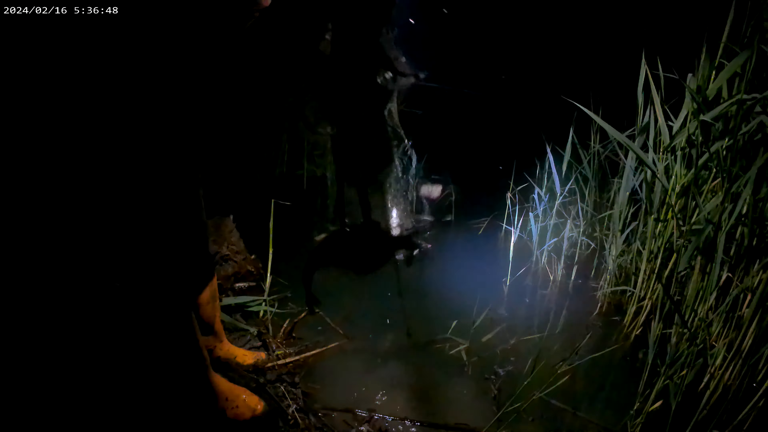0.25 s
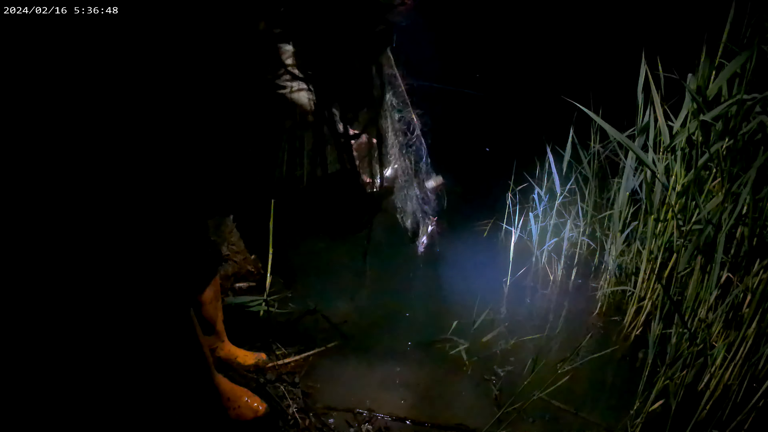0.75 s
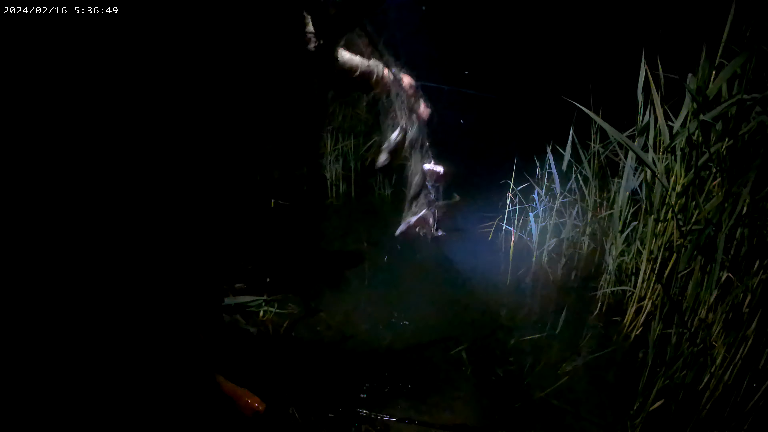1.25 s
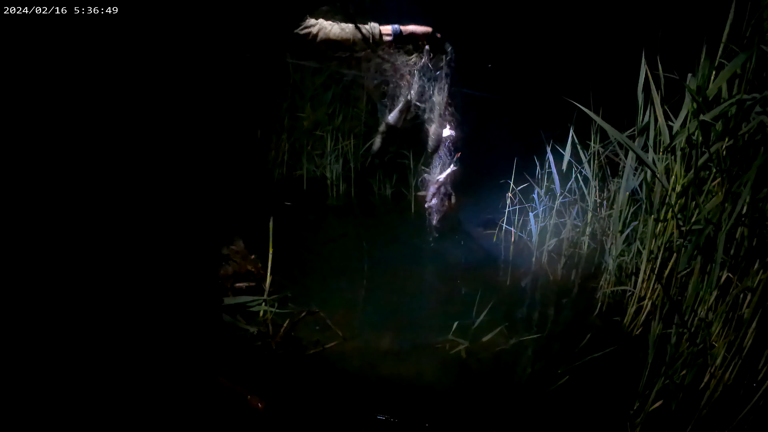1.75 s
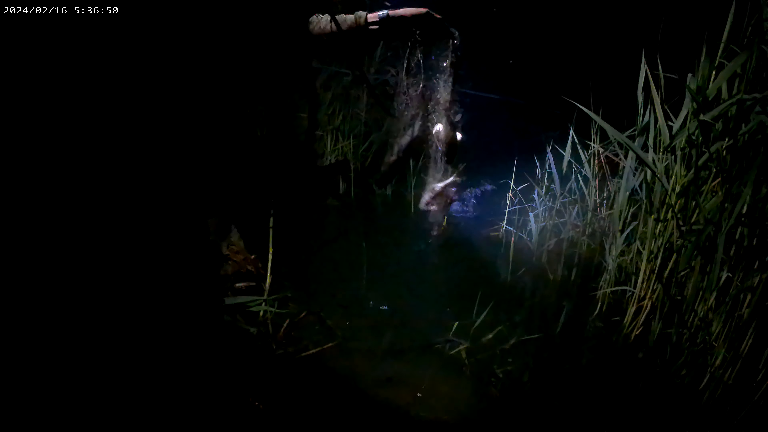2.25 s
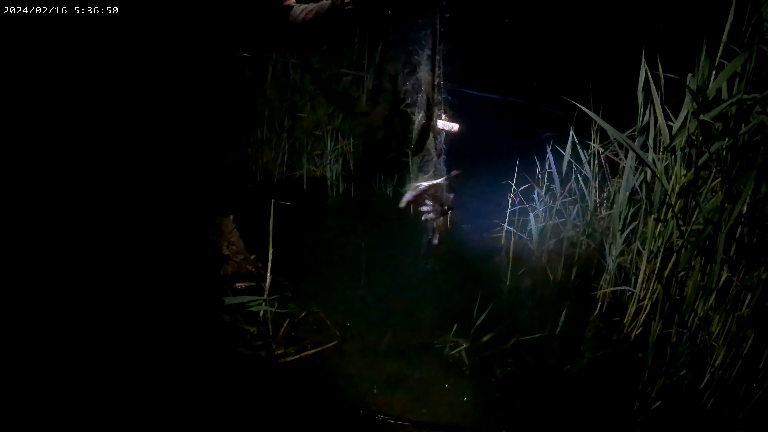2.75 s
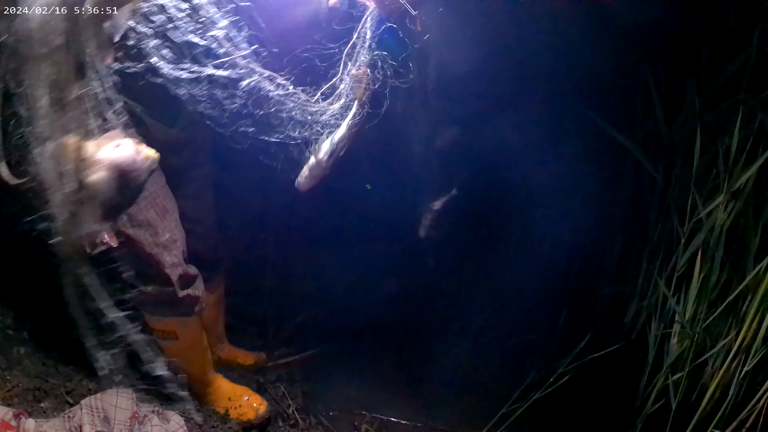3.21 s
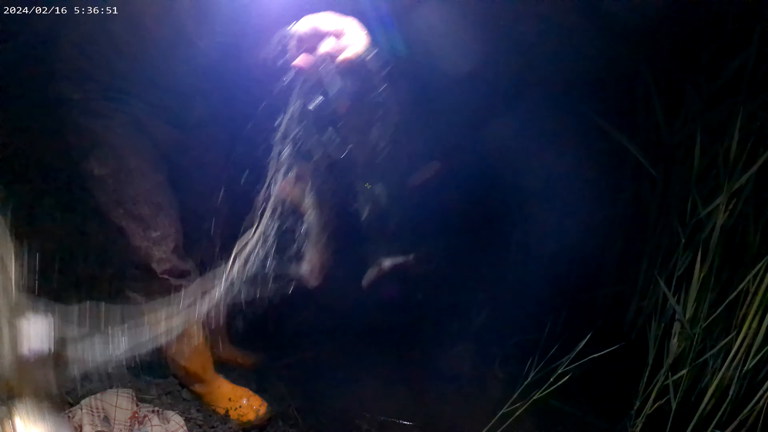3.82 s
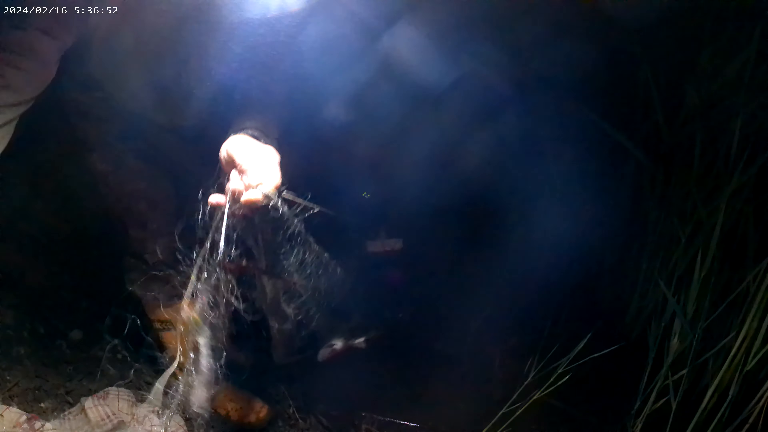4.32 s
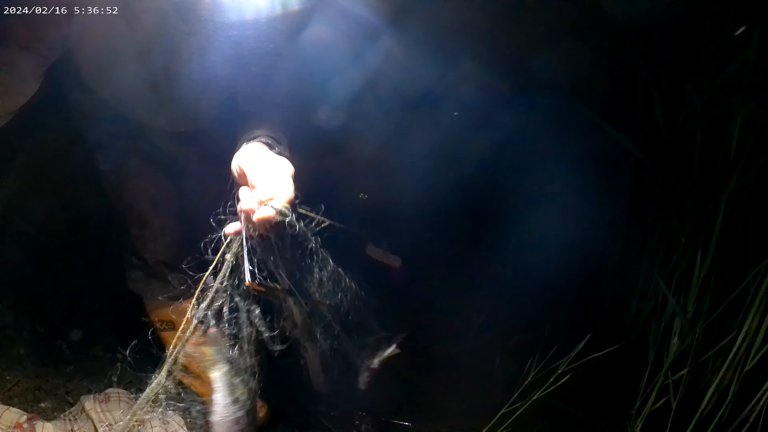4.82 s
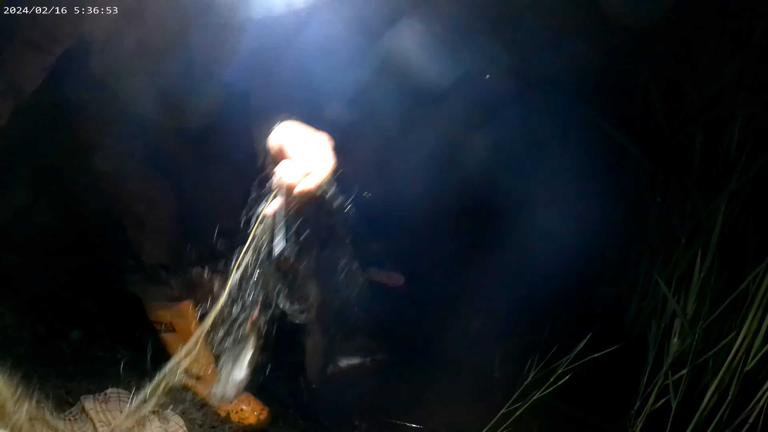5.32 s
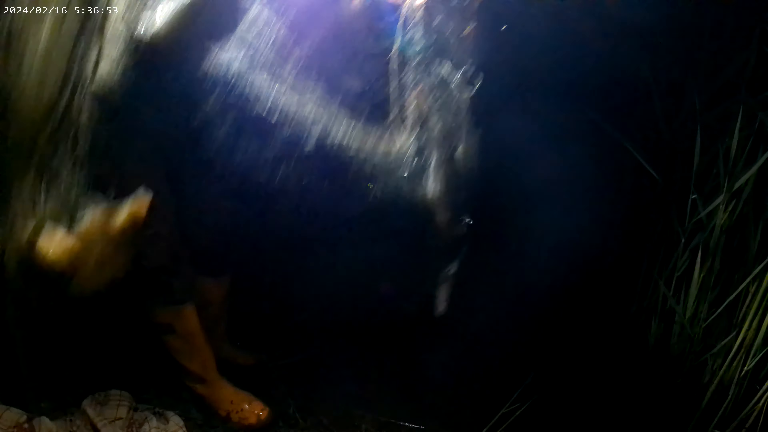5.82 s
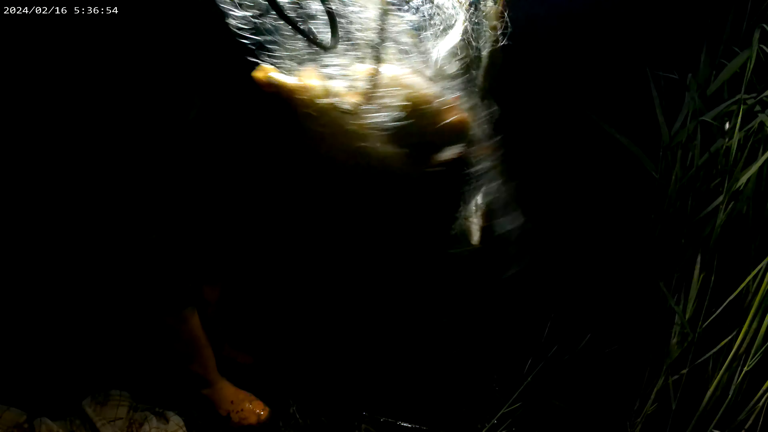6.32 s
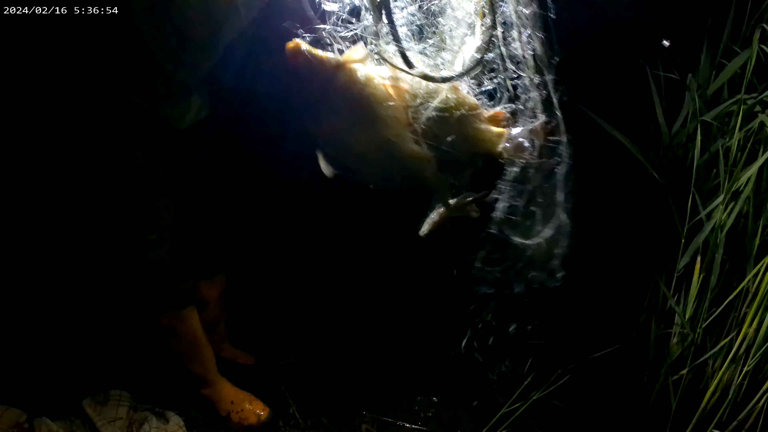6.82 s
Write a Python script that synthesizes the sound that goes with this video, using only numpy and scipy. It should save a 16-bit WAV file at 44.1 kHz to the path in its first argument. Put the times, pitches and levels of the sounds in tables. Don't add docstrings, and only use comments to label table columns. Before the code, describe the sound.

A distant one-cylinder engine thumps steadily, over five times a second, under soft night rumble and hiss. Close to a small boxy microphone outdoors, a wet fishing net drips, then sheds water in a quick run of round plops. After a lull it is dragged and handled: wet rasping, dull weight knocks, slaps and crisp strand ticks, thinning to a few late knocks, a flick and one small bubble.

```python
import sys
import numpy as np
from scipy import signal
from scipy.fft import rfft, irfft
from scipy.io import wavfile
from scipy.ndimage import uniform_filter1d

SR = 44100
rng = np.random.default_rng(int(sys.argv[2]) if len(sys.argv) > 2 else 0)


def boost(x):
    u = np.asarray(x, float) / 20
    return 10 ** u


def persist_wave(psi):
    counts = np.round(np.clip(psi, -1, 1) * 32767).astype(np.int16)
    wavfile.write(sys.argv[1], SR, np.atleast_2d(counts).T)


N = 311234
TIME = np.arange(N) / SR

# start in seconds, peak in dB, pitch in Hz, ring in seconds.
DEEP_BUBBLES = [(.51, -37, 944, .0061), (.511, -57, 1900, .006), (.512, -51.5, 717, .026),
                (.517, -56, 920, .025), (.668, -64, 1270, .007), (.756, -60.5, 3740, .012),
                (1.619, -60, 1070, .008), (1.655, -55, 1320, .008), (1.882, -49, 1600, 0.0072),
                (1.977, -51, 1110, 0.0046), (1.99, -46.5, 1090, 0.0047), (2.083, -43, 725, 0.0036),
                (2.106, -33, 1350, 0.0023), (2.176, -33.5, 1008, 0.0089), (2.186, -50, 2950, .0037),
                (2.204, -34, 860, 0.0061), (2.22, -31.5, 898, 0.019), (2.264, -49, 760, .006),
                (2.286, -49.5, 730, .014), (2.296, -59, 2200, .006), (2.327, -53, 1340, .015),
                (2.363, -43.5, 856, 0.022), (2.458, -56.5, 1370, 0.013), (2.897, -48, 1170, .006),
                (4.05, -52, 1150, .018)]
# start in seconds, peak in dB, first pitch in Hz, ring in seconds,
# glide in octaves.
SHALLOW_BUBBLES = [(.583, -57.5, 1315, .014, -.08), (.604, -51.5, 613, .026, .17),
                   (.626, -56, 760, .042, .85), (.684, -54.5, 554, .038, 0.35),
                   (2.012, -49, 860, .012, 0.38), (2.03, -55, 1150, .007, -.2),
                   (2.0584, -45, 3660, .0059, 0.39), (2.068, -51, 1676, .0095, .45),
                   (2.283, -49, 1305, .02, -.16), (2.302, -50.5, 900, 0.025, .16),
                   (2.357, -46.5, 1110, .011, 0.25), (2.392, -52, 371, .057, 0.76),
                   (6.686, -50, 1560, 0.014, -0.22)]
# peak time in seconds, gurgle in dB, rasp gain in dB (dryness),
# fade in seconds.
RUNOFF = [
    (.62, -72, 2, .08),
    (.77, -77, 13, .03),
    (1.63, -69, 4.5, 0.092),
    (2.03, -56, 3, 0.037),
    (2.1, -50.5, 2.5, 0.021),
    (2.2, -60, 4, 0.06),
    (2.32, -56.5, 3, 0.065),
    (2.4, -68, 5, 0.043),
    (2.56, -70, -10, .08),
]
# peak time in seconds, gurgle in dB, rasp gain in dB (dryness),
# fade in seconds.
DRAGS = [(3.7, -83, 9, .12), (3.9, -60, -2, 0.034), (3.95, -64, -2, .03), (4.02, -57, 2.5, 0.027),
         (4.08, -60, -2, .03), (4.14, -58.5, 3, .05), (4.22, -62.5, -1, 0.035), (4.3, -56.5, -5, .05),
         (4.375, -67, 4.5, 0.033), (4.47, -59, 7.5, 0.028), (4.56, -62.5, 2, 0.073), (4.64, -69, 4, .05),
         (4.71, -70.5, 11.5, 0.046), (4.86, -67, -9, .06), (5.15, -80, 15, .08), (5.45, -68, 5.5, 0.091),
         (5.6, -72, 5, .06), (5.75, -70, 4, .08)]
# start in seconds, body peak in dB, body pitch in Hz, crackle in dB over the body,
# length in seconds.
WEIGHTS = [(3.871, -44, 490, -8, 0.0053), (3.991, -28.5, 235, -11.5, 0.0027),
           (4.084, -33.5, 537, -14, 0.0024), (4.088, -28.5, 604, -16, 0.0034),
           (4.136, -43.5, 424, -8, 0.0074), (4.1806, -23, 392, -16, 0.0036),
           (4.1866, -28, 247, -27, 0.0016), (4.257, -36, 510, -16, 0.0012),
           (4.369, -40.5, 353, -10, 0.0029), (4.4409, -29.5, 450, -12, 0.0042),
           (4.447, -38, 402, -18, 0.0072), (5.437, -47.5, 400, -26, .0044), (5.517, -40, 630, -12, .002)]
# start in seconds, slap peak in dB, crackle in dB over the slap, length in seconds.
SLAPS = [
    (3.91, -33, -15.5, 0.0032),
    (3.9901, -28, -13, 0.0026),
    (4.01, -49, -3, 0.0067),
    (4.073, -44, -1.5, 0.0041),
    (4.192, -51, -13, 0.0031),
    (4.221, -48, -1, 0.0093),
    (4.29, -41, -6.5, .01),
    (4.309, -41, -24, .0057),
    (5.456, -54, 1, .0015),
    (5.957, -46.5, -6, .0009),
]
# start in seconds, peak in dB, brightest pitch in Hz.
TICKS = [(.3202, -51, 5490), (.412, -55, 4780), (0.4835, -56, 4050), (.73, -55, 4420), (.7694, -53, 5450),
         (.9398, -55.5, 5800), (1.039, -54, 6350), (1.333, -53.5, 3320), (1.883, -52.5, 5080),
         (1.938, -47.5, 5470), (2.014, -54, 5590), (2.102, -45, 5600), (2.27, -50, 3730),
         (2.299, -46, 5900), (2.308, -46, 3750), (2.366, -58, 4900), (2.8035, -56, 10100),
         (3.5079, -53, 4670), (3.672, -50.5, 7990), (3.919, -54, 8640), (4.008, -42, 8610),
         (4.0164, -46, 9850), (4.09, -49, 5200), (4.133, -53, 10100), (4.3211, -53, 9700),
         (4.678, -47, 10000), (4.9814, -48, 9950), (5.0744, -53, 9830), (5.1345, -53, 9740),
         (6.254, -52, 4420)]
# pitch in Hz, width in Hz, level in dB.
HOUSING = [
    (2440, 730, 3),
    (5230, 1860, -4.5),
    (9850, 990, -6),
    (15140, 980, -8),
]
# time in seconds, level in dB above the usual firing.
ENGINE_LOAD = [(.17, 0.5), (.36, -2.5), (.54, 4), (.9, -0.5), (1.1, -3), (1.82, 0.5), (2.37, 0.5),
               (3.48, 1.5), (3.84, -2), (4.21, 3), (4.95, 0), (5.5, 1.5), (5.86, 0.5), (6.04, -1.5),
               (6.4, 0.5), (6.77, 2), (7, -1)]
# start in seconds, seconds between firings.
ENGINE_PACE = [
    (0, .1832),
    (1.9, .18372),
    (5.35, .1823),
]
# centre in seconds, peak in dB, pitch in Hz.
BUMPS = [
    (0.319, -40.5, 37.3),
    (3.19, -39.5, 70),
]
# pitch in Hz, level in dB per Hz.
NIGHT_COLOUR = [(12, -29), (20, -2), (22, -5.5), (70, -2), (125, -7.5), (198, -12.5), (415, -18.5),
                (592, -21), (1170, -24.5), (1540, -29), (7310, -37.5), (12600, -38), (13700, -38)]
# time in seconds, centre in Hz, level in dB.
WHINE = [(0, 14400, -70), (1, 14400, -71), (2.9, 14400, -74), (3.079, 14050, -72), (3.35, 14300, -81),
         (3.9, 14200, -77), (5.05, 14400, -76), (5.5, 14400, -74), (6.0, 14130, -84), (6.2, 14150, -70),
         (6.4, 14450, -70), (6.85, 14280, -68), (7.06, 14400, -70)]
# start in seconds, sweep in Hz,
# share of the second pulse from 0 to 1.
WHINE_STATES = [
    (0, 143, .83),
    (3.2, 58, .9),
    (6.1, 335, .35),
]

THUMP_DB, THUMP_HZ, THUMP_SWEEP_HZ_PER_S = -42, 85.3, 8100
THUMP_RISE_S, THUMP_FALL_S = 0.0073, 0.0078
SPARK_S, SPARK_WIDTH_S = .1512057, .000031


def bubbles():
    out = np.zeros(N)
    deep = [(*row, .04) for row in DEEP_BUBBLES]
    for s, db, start_hz, ring_s, glide in deep + SHALLOW_BUBBLES:
        t = np.arange(int(2 * ring_s * SR)) / SR
        hz = start_hz * 2 ** (glide * (t / ring_s) ** 1.49)
        turns = np.cumsum(np.minimum(hz, 9000)) / SR
        shape = (1 - np.exp(-t / 0.00036)) * np.exp(-1.1 * (t / ring_s) ** 2.3)
        add(out, s, boost(db) * shape * np.sin(2 * np.pi * turns))
    return out


def scrape():
    rasp = grains(200, 1.2, 0.011) * grains(440, 3.3, 0.0027) * rng.standard_normal(N)
    gurgle = grains(220, 3.5, .005) * rng.standard_normal(N) + .4 * unit(rasp)
    gurgle = unit(gurgle) + 0.3 * fizz(260, 502, 1.754, 4.6)
    rasp = unit(rasp) + .2 * fizz(500, 2300, 1.6, 4.)

    low = unit(steep(gurgle, 946, 1130) + 0.78 * steep(gurgle, 466, 480))
    middle = unit(steep(rasp, 5400, 3200) + 0.6 * steep(rasp, 2650, 900))
    top = unit(steep(rasp, 8870, 3900) + 0.92 * steep(rasp, 15200, 1800))
    scuff = low + boost(-4) * unit(steep(gurgle, 350, 380))
    scuff = signal.sosfilt(signal.butter(N=6, Wn=1450, fs=SR, output="sos"), scuff)
    sheen = top + boost(-15) * unit(steep(rasp, 15100, 1500))

    runoff_rasp = boost(-10.5) * middle + boost(-16) * top
    drag_rasp = boost(-10) * middle + boost(-9) * sheen
    out = np.zeros(N)
    for table, wet, dry_rasp in ((RUNOFF, low, runoff_rasp), (DRAGS, scuff, drag_rasp)):
        for s, db, dry_db, fade_s in table:
            out += boost(db) * stroke(s, fade_s) * (wet + boost(dry_db) * dry_rasp)
    return out


def stroke(s, fade_s):
    return np.exp(-np.abs(TIME - s) / fade_s)


def grains(rate, spread_db, tail_s):
    size = (rng.random(N) < rate / SR) * boost(spread_db * rng.exponential(size=N))
    gate = signal.lfilter([1], [1, -np.exp(-1 / (tail_s * SR))], size)
    return uniform_filter1d(gate, size=60) + 0.64


def fizz(rate, low_hz, octaves, cycles):
    out = np.zeros(N)
    for when, pitch, size in rng.random((int(rate * N / SR), 3)):
        hz = low_hz * 2 ** (octaves * pitch)
        turns = np.arange(int(3 * cycles / hz * SR)) * hz / SR
        ring = np.exp(-turns / cycles) * np.sin(2 * np.pi * turns * (1 + 0.0138 * turns))
        add(out, when * (N - 1) / SR, boost(-16 * size) * ring)
    return unit(out)


def weights():
    out = np.zeros(N)
    for s, db, hz, crackle_db, length_s in WEIGHTS:
        add(out, s, boost(db) * blow(-8, 0, hz, crackle_db, length_s))
    return out


def slaps():
    out = np.zeros(N)
    for s, db, crackle_db, length_s in SLAPS:
        add(out, s, boost(db) * blow(0, -11, 500, crackle_db, length_s))
    return out


def blow(slap_db, body_db, hz, crackle_db, length_s):
    noise, t = rng.standard_normal((3, 2000)), np.arange(2000) / SR
    dull = signal.butter(N=6, Wn=1400, fs=SR, output="sos")
    bright = signal.butter(N=4, Wn=2100, btype="high", fs=SR, output="sos")
    slap = peak(signal.sosfilt(dull, band(burst(noise[0], length_s), 1000, 520)))
    swing = -np.sin(2 * np.pi * hz * t) + 0.34 * unit(steep(noise[1], hz, hz))
    body = peak(burst(swing, 0.72 * length_s))
    crackle = peak(signal.sosfilt(bright, housing(burst(noise[2], 1.29 * length_s))))
    return boost(slap_db) * slap + boost(body_db) * body + boost(crackle_db) * crackle


def ticks():
    out = np.zeros(N)
    for s, db, hz in TICKS:
        snap = burst(rng.standard_normal(1500), 0.0024)
        tick = housing(snap, hz, 1.0) + 2.6 * steep(snap, hz, 0.43 * hz)
        add(out, s, boost(db) * peak(tick))
    return out


def burst(noise, length_s):
    t = np.arange(len(noise)) / SR
    return noise * (1 - np.exp(-(t / (0.38 * length_s)) ** 2)) * np.exp(-(t / length_s) ** 1.05)


def housing(x, centre_hz=6000, octaves=9.):
    out = np.zeros(len(x))
    for hz, width_hz, db in HOUSING:
        off_centre = np.log2(hz / centre_hz) / octaves
        out += boost(db - 2 * off_centre ** 2) * steep(x, hz, 0.92 * width_hz)
    return out


def engine():
    out, lead = np.zeros(N), 1300
    t = np.arange(-lead, 1700) / SR
    shape = np.exp(-np.where(t < 0, (t / THUMP_RISE_S) ** 2 / 2, t / THUMP_FALL_S))
    turns = np.cumsum(np.clip(THUMP_HZ + THUMP_SWEEP_HZ_PER_S * t, 35, 165)) / SR
    thump = shape * np.cos(2 * np.pi * (turns - turns[lead]))
    for s, db in firings():
        add(out, s - lead / SR, boost(THUMP_DB + db) * thump)
    return out


def firings():
    times = [.1748]
    while times[-1] < N / SR - .2:
        times.append(times[-1] + held(ENGINE_PACE, times[-1])[0])
    jitter_s = .0008 * rng.standard_normal(len(times))
    scatter_db = .8 * rng.standard_normal(len(times))
    return zip(times + jitter_s, np.interp(times, *np.transpose(ENGINE_LOAD)) + scatter_db)


def bumps():
    out = np.zeros(N)
    for s, db, hz in BUMPS:
        t = TIME - s
        out += boost(db) * np.exp(-(t * hz / 0.56) ** 2) * np.cos(2 * np.pi * hz * t)
    return out


def night():
    hz = np.maximum(np.fft.rfftfreq(N, 1 / SR), 1)
    f, db = np.transpose(NIGHT_COLOUR[:-1])
    colour = rfft(rng.standard_normal(N)) * boost(np.interp(np.log(hz), np.log(f), db))
    low_share = 1 / (1 + (hz / 300) ** 2)
    rumble = irfft(colour * np.sqrt(low_share), N) * boost(.8 * walk(3))
    hiss = irfft(colour * np.sqrt(1 - low_share) * 1j, N) * boost(0.18 * walk(17))
    return boost(-55) * unit(rumble + hiss)


def whine():
    s, *columns = np.transpose(WHINE)
    hz, db = (np.interp(TIME, s, c) for c in columns)
    sweep_hz, second = held(WHINE_STATES, TIME)
    frame = (30 * TIME + 0.93 + 0.046 * walk(3.3)) % 1
    pulses = np.exp(-((frame - .3) / 0.13) ** 2) + second * np.exp(-((frame - .78) / 0.21) ** 2)
    waver_hz = np.minimum(40 + .6 * sweep_hz, 120) * walk(500)
    turns = np.cumsum(hz + 2 * sweep_hz * (frame - .4) + waver_hz) / SR
    tone = np.sin(2 * np.pi * turns) + boost(-12.5) * np.sin(2 * np.pi * turns * 2 / 3)
    return boost(db + 1.5 + 1.4 * walk(40)) * (pulses + 0.37) * tone


def spark():
    u = (TIME - SPARK_S) / SPARK_WIDTH_S
    kick = -(.39 + 1.32 * u) * np.exp(-u ** 2)
    limited = irfft(rfft(kick) * (np.fft.rfftfreq(N, 1 / SR) < 16800), N)
    return limited * np.exp(-((TIME - SPARK_S) / .002) ** 2)


def top_cut(x):
    hz, spectrum = np.fft.rfftfreq(N, 1 / SR), rfft(x)
    edges = np.linspace(14950, 15800, num=4)
    out, common = irfft(spectrum * (hz <= edges[0]), N), walk(30)
    for lo, hi, keep in zip(edges, edges[1:], (.9, .75, .6)):
        strip = irfft(spectrum * ((hz > lo) & (hz <= hi)), N)
        out += strip * np.clip(keep + 0.24 * common + 0.55 * walk(70), .03, 1.5)
    return out


def unit(x):
    return x / np.sqrt(np.mean(x ** 2))


def peak(x):
    return x / np.abs(x).max()


def band(x, hz, width_hz):
    return signal.lfilter(*signal.iirpeak(hz, max(hz / width_hz, .3), fs=SR), x)


def steep(x, hz, width_hz):
    return band(band(x, hz, width_hz), hz, width_hz)


def walk(rate):
    k = int(SR / rate)
    steps = np.repeat(rng.standard_normal(N // k + 1), k)
    return 1.7 * uniform_filter1d(uniform_filter1d(steps, k), k)[:N]


def held(table, s):
    rows = np.array(table)
    index = np.searchsorted(rows[:, 0], s, side="right") - 1
    return rows[np.maximum(index, 0), 1:].T


def add(out, s, piece):
    i = int(s * SR)
    out[i:i + len(piece)] += piece[:N - i]


def scene():
    near = bubbles() + weights() + slaps() + ticks() + scrape()
    echo = np.zeros(2000)
    echo[rng.integers(150, 2000, 14)] = rng.standard_normal(14)
    echo *= np.exp(-np.arange(2000) / 700)
    reflected = boost(-15.0) * signal.fftconvolve(near, echo)[:N]
    heard = near + reflected + engine() + bumps() + night() + whine()
    duck = .99 * np.exp(-((TIME - SPARK_S) / .011) ** 8)
    high = signal.butter(N=4, Wn=1800, btype="high", fs=SR, output="sos")
    treble = signal.sosfiltfilt(high, heard)
    return (top_cut(heard - duck * treble) + spark())[None]


def roll_off(x):
    return signal.sosfilt(signal.butter(12, 17130, fs=SR, output="sos"), x)


def record(dry):
    mix = dry + .0028
    return roll_off(mix)


dry = scene()
out = record(dry)
persist_wave(out)
```